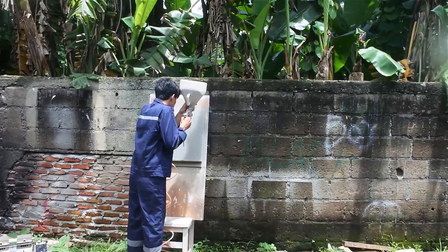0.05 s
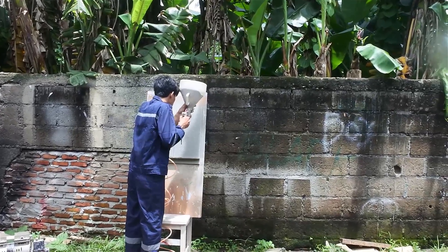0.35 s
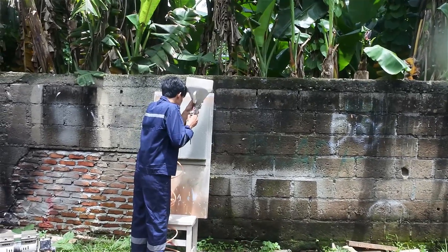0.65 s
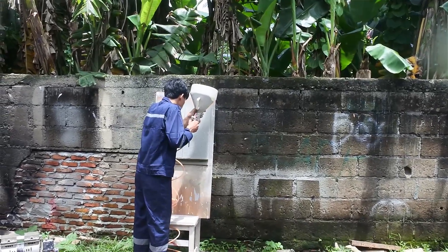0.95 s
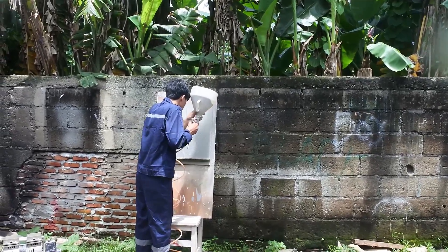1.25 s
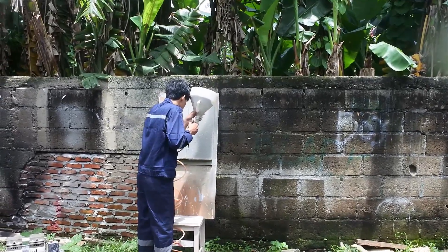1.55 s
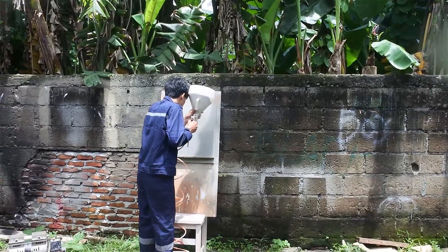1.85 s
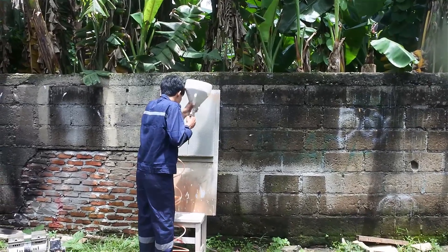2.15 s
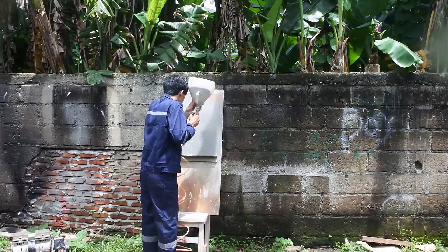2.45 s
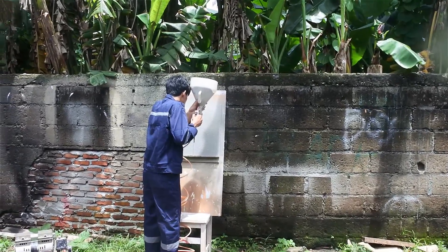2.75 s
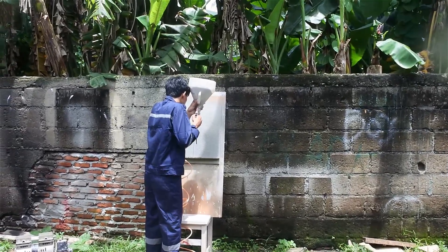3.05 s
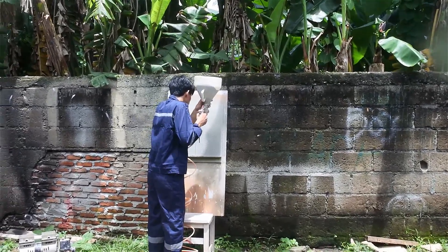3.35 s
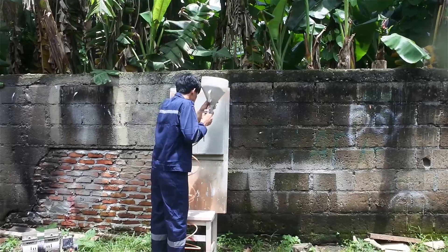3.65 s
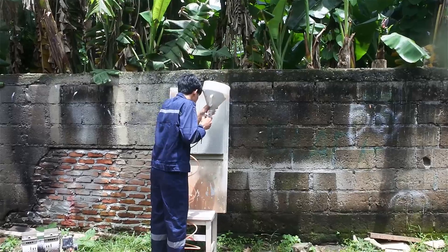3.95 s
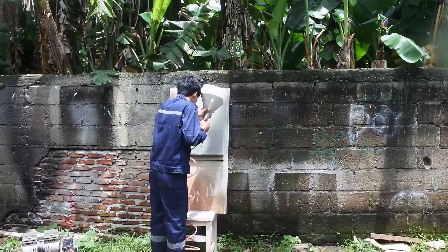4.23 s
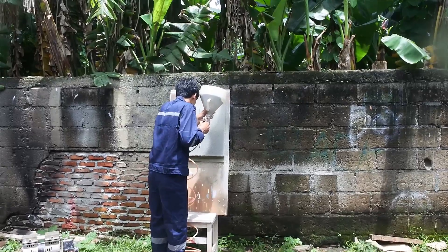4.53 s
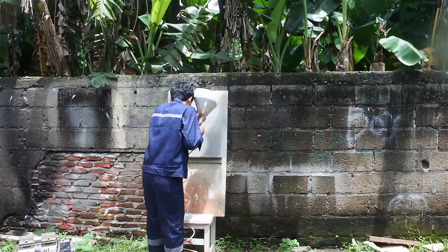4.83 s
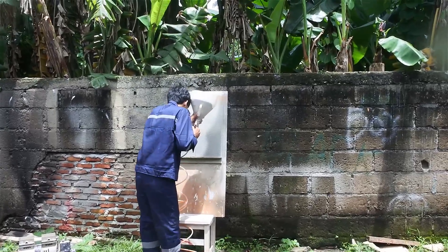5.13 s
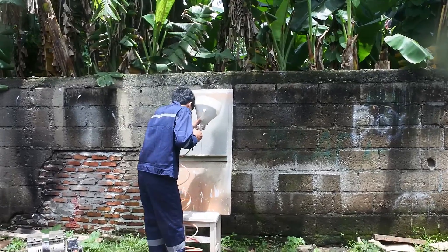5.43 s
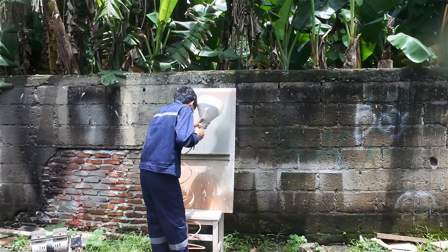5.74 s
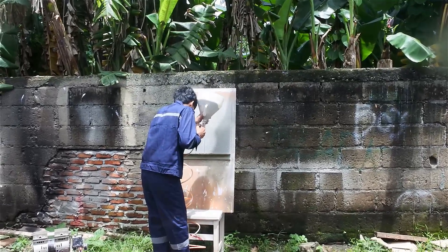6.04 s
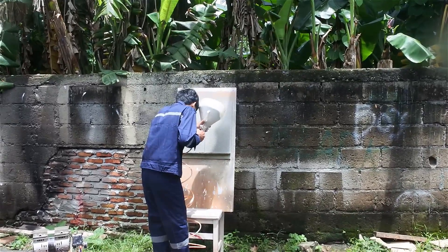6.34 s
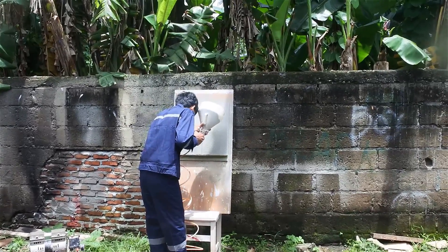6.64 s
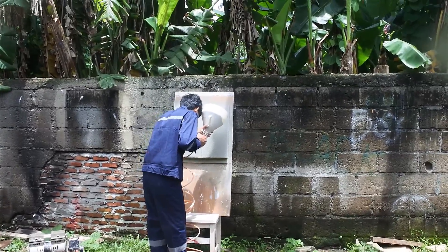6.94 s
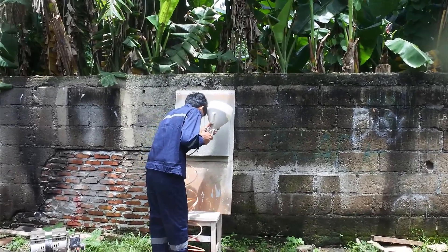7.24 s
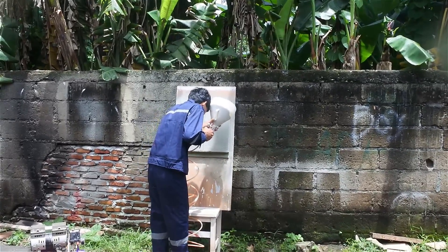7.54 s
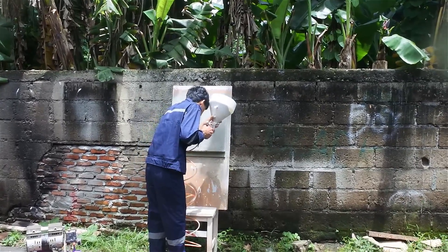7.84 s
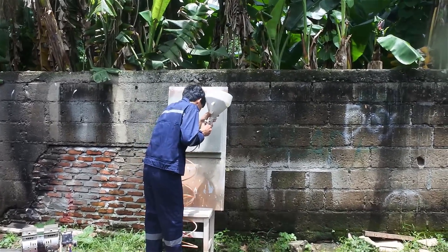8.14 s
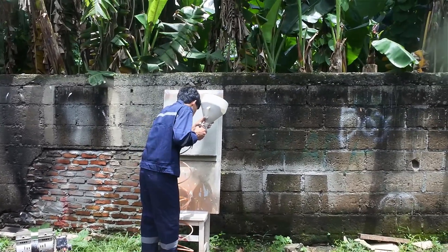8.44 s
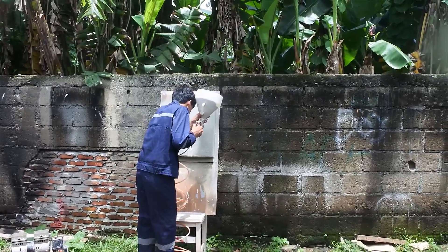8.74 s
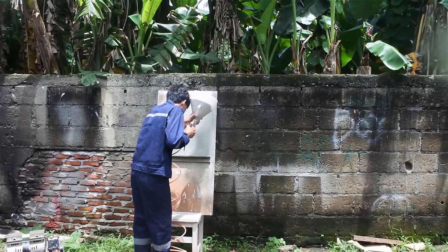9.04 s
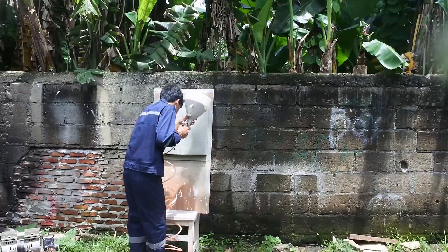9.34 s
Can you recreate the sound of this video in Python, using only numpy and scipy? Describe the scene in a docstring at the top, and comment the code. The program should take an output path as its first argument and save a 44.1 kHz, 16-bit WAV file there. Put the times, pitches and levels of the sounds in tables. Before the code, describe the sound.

Compressed air hisses from a paint sprayer, easing once briefly midway, over the low hum of a running compressor.

```python
"""A hopper gun sprays texture paint onto a board in a walled yard, a few metres from the microphone.
From the start its turbulent air jet hisses, half hidden behind the painter, and thick paint splutters
through in slugs, while a piston compressor drones close by. Midway the trigger is eased once and pulled
again. The spray carries on to the end, and a low rumble, probably traffic, keeps swelling beyond the wall."""
import sys
import numpy as np
from scipy import signal
from scipy.fft import rfft, irfft, next_fast_len
from scipy.io import wavfile
from scipy.ndimage import map_coordinates

SR = 44100
rng = np.random.default_rng(int(sys.argv[2]) if len(sys.argv) > 2 else 0)


def materialize(psi):
    """Save the field psi as 16-bit PCM at rate SR to the path in sys.argv[1].

    A 1-D psi becomes a single channel; in a 2-D psi each row is a channel.
    """
    bounded = np.clip(np.atleast_2d(psi).T, -1, 1)
    quanta = np.round(bounded * 32767).astype(np.int16)
    wavfile.write(sys.argv[1], SR, quanta)


N = 422462
TIME = np.arange(N) / SR
STEPS, SLOW_STEPS = TIME[::64], TIME[::256]  # coarse clocks for slow controls
EARS = np.array([[1], [-1]])  # left, right


def air_jet(flutter_db=0.94, grain_db=1.18, body_hz=5300, body_width_hz=1800, lag_ms=0.049, air_db=3):
    """Turbulence radiates hiss; the painter's acoustic shadow dims and delays its treble on the right."""
    # How the gun is held. Each row: time in seconds, then weights of brightness, leftward bias and body.
    aim = [(0, -4, -1.5, -2.5), (.55, 0, 6.5, 2.5), (1.4, 1.5, 8, 1), (3.2, 1.5, 7, 2), (5.3, 1.3, 9, -3.5),
           (6.0, 1, 9, 4), (6.8, 0.5, 9, -7), (8.2, -0.5, 7.5, 2), (8.8, -2, 2.5, -9),
           (9.55, 1.5, 2.5, 10.5)]
    # Spectrum of the jet. Each row: frequency in Hz, relative level in dB.
    jet_spectrum = [(800, -47.5), (2000, -16.5), (3400, -16.5), (4000, -14), (4500, -10.5), (5600, -9),
                    (6700, -2.5), (7800, -3), (9200, -2.5), (11000, -2.5), (12200, -7), (13600, -8),
                    (14600, -15), (15800, -28)]

    def path(hz, s):
        bright, bias, body = curves(aim, s)
        tilt_db = bright * slope([(4000, -2.0), (8500, -0.029), (13000, 1.24)], hz)
        body_db = 0.87 * body * bell(hz, body_hz, body_width_hz)
        db = slope(jet_spectrum, hz) + tilt_db + body_db + rings(hz, s) + swirl(hz, s)
        shade = slope([(3000, -0.11), (5200, -0.079), (7500, 1.24), (10000, 1.36), (13000, 1.66)], hz)
        sides = undb(EARS[:, :, None] * shade * bias / 2)
        delay = np.exp(1j * np.pi * EARS[:, :, None] * hz * np.clip(shade, 0, 1) * lag_ms / 1000)
        return undb(db) * sides / np.sqrt(np.mean(sides ** 2, axis=0)) * delay
    hiss = unit(sweep(stereo_noise([(2000, 1.0), (5000, 0.81), (7000, 0.098)]), path))
    return hiss * undb(air_flow() + air_db + flutter_db * walk(45) + grain_db * walk(900))


def air_flow(ease_s=4.605, pull_s=4.905, close_s=0.11, open_s=0.07, leak_db=-16.5):
    """Throttling: the air's level in dB falls to a leak as the trigger is eased and recovers on the pull."""
    # The jet at full trigger. Each row: time in seconds, relative level in dB.
    full_air = [(0, -19.5), (.7, -19.5), (1.1, -20), (1.7, -19), (2.2, -20), (2.6, -19), (3.95, -20.5),
                (4.55, -21), (5.1, -18), (5.63, -18.5), (5.69, -20.5), (6.55, -22.5), (6.8, -20.5),
                (7.6, -22), (8.25, -24.5), (8.58, -23.5), (8.78, -24), (9.2, -22), (9.58, -22.5)]
    eased = np.clip((TIME - ease_s) / close_s, 0, 1) * np.exp(-np.maximum(TIME - pull_s, 0) / open_s)
    return curves(full_air)[0] + leak_db * eased


def swirl(hz, s):
    """Treble resonances of the jet wander as it plays over the board; their boost is in dB."""
    # Each entry: resting frequency of a resonance in Hz.
    resting_hz = [7200, 9000, 11000, 13200]
    return sum((2.5 + 1.7 * walk(6, s)) * bell(hz, centre_hz * (1 + .045 * walk(3, s)), width_hz=550)
               for centre_hz in resting_hz)


def paint(splutter_db=1.03, drop_db=1.73, low_width_hz=290, middle_width_hz=620, middle_db=5, paint_db=3.5):
    """Atomisation: slugs burst into drops, whose crackle resonates in the gap between gun and board."""
    # Gap resonances. Each row: time in seconds, low and middle frequency in Hz, boost of the low one in dB.
    gap = [(0, 1700, 2660, 21.5), (.9, 1660, 2750, 11), (1.4, 1700, 2730, -2), (2.1, 1760, 2720, 5.5),
           (4.4, 1760, 2700, 1), (5.3, 1800, 2730, 5), (6.6, 1610, 2620, 9), (8, 1580, 2630, 9.5),
           (8.8, 1640, 2830, 12.5), (9.58, 1640, 2790, 6)]
    # Spectrum of the crackle. Each row: frequency in Hz, relative level in dB.
    paint_spectrum = [(400, -37), (800, -5), (1100, -8), (1400, -8.5), (2100, -7), (3000, 0), (3350, -4),
                      (3950, -2), (4600, -1), (6500, 2), (10000, -22), (15000, -14)]

    def path(hz, s):
        low_hz, middle_hz, low_db = curves(gap, s)
        gap_db = low_db * bell(hz, low_hz, low_width_hz) + middle_db * bell(hz, middle_hz, middle_width_hz)
        pan_db = slope([(1300, 0.0), (2600, -5.5), (3400, -4.5), (4500, 2.5)], hz)
        return undb(slope(paint_spectrum, hz) + gap_db + rings(hz, s) + EARS[:, :, None] * pan_db / 2)
    noise = stereo_noise([(1200, 0.93), (2800, 0.68), (3500, 0.12), (7000, 0.23)])
    crackle = noise * undb(drop_db * walk(1400) + splutter_db * walk(60))
    return unit(sweep(crackle, path)) * undb(paint_flow() + paint_db)


def paint_flow(feed_db=-31.5, db_per_air_db=0.43, lumpy_db=0.5):
    """Entrainment: the air draws a thin, lumpy feed of paint with slugs on top; its level is in dB."""
    air = air_flow()
    lumps = np.interp(TIME, STEPS, slug_flow(STEPS) + lumpy_db * walk(22, STEPS))
    return feed_db + db_per_air_db * (air - air.mean()) + lumps


def slug_flow(at, edge_s=0.033):
    """Slug flow: each lump passing the nozzle lifts the paint's level in dB, holds it and lets it fall."""
    # Each row: start in seconds, end in seconds, level over the steady feed in dB.
    slugs = [(0, 0.148, 7), (0.298, 0.62, 5), (0.864, 1.193, 5.5), (1.204, 1.3, 2.5), (1.49, 1.78, 3),
             (1.843, 2.01, 1.5), (2.04, 2.275, 6.5), (2.655, 2.894, 5), (3.185, 3.266, 5.5),
             (3.33, 3.377, 3), (3.832, 4.05, 5), (4.185, 4.22, 1), (4.246, 4.315, 5.5), (4.37, 4.47, 6),
             (4.907, 4.948, 7), (5.047, 5.124, 9.5), (5.176, 5.57, 5), (5.73, 6.06, 3.5), (6.174, 6.794, 3),
             (6.922, 7.09, 2.5), (7.186, 7.493, 2.5), (7.6, 7.753, 2.5), (7.84, 8.227, 2.5),
             (8.39, 8.802, 4.5), (8.856, 8.894, 5.5), (8.935, 9.256, 5.5), (9.31, 9.594, 6.5)]
    return sum(db * np.clip(np.minimum(at - start, end - at) / edge_s + .5, 0, 1) for start, end, db in slugs)


def rings(hz, s, width_hz=240, fade_s=0.02, full_slug_db=5.0):
    """Narrow resonances, driven by the slugs, come and go as the nozzle turns; their boost is in dB."""
    # Each row: start and end in seconds, first and last frequency in Hz, full boost in dB.
    resonances = [(0, .15, 4650, 4750, 6), (0, .5, 8050, 10800, 3), (.3, .6, 4700, 4750, 3),
                  (2.05, 2.9, 2800, 2750, 1.5), (6.3, 7.897, 2780, 2700, 9.5), (6.3, 8.2, 2320, 2340, 6),
                  (6.3, 7.8, 9200, 9150, 10.5), (6.3, 7.8, 6600, 6350, 11), (8.05, 8.21, 5600, 5570, 13),
                  (8.4, 9.58, 4640, 4590, 7), (8.4, 9.58, 5700, 5480, 7), (8.93, 9.28, 9300, 9600, 10),
                  (9.33, 9.58, 5950, 6000, 5.5)]
    drive = np.clip(slug_flow(s) / full_slug_db, 0, 1)
    boost_db = 0
    for start, end, first_hz, last_hz, db in resonances:
        fade = np.clip(np.minimum(s - start, end - s) / fade_s + 1, 0, 1)
        centre_hz = np.interp(s, [start, end], [first_hz, last_hz])
        boost_db = boost_db + db * fade * bell(hz, centre_hz, width_hz)
    return drive * boost_db


def choking(half_width_s=0.015):
    """Obstruction: thick paint plugs the nozzle for a moment, and the gain of the whole spray dips."""
    # Each row: time in seconds, depth in dB (a negative depth is a brief lift).
    chokes = [(1.32, -1.5), (2.03, 2), (2.29, 1.5), (3.01, 3), (4.06, 1), (5.14, 1), (6.13, 4.5),
              (6.57, 2.5), (7.51, 4), (8.28, 3.5), (8.83, 2), (8.91, 2), (9.29, 2)]
    dip_db = sum(db * np.exp(-((STEPS - s) / half_width_s) ** 2) for s, db in chokes)
    return np.interp(TIME, STEPS, undb(-dip_db))


def reflections(spray):
    """Comb filtering: echoes off board, hopper and wall interfere with the spray, sliding as the hand moves."""
    # Each row: mean delay in milliseconds, level against the direct sound in dB.
    reflectors = [(.9, -13), (1.6, -12), (2.7, -12), (4.3, -13), (7.3, -14)]
    out, samples = spray, np.arange(N)
    for ms, db in reflectors:
        sway = np.interp(TIME, SLOW_STEPS, walk(3.5, SLOW_STEPS))
        delays = ms * (1 + .03 * sway + .004 * EARS) * SR / 1000
        echo = np.array([np.interp(samples - d, samples, channel) for d, channel in zip(delays, spray)])
        out = out + undb(db) * echo
    return out / np.sqrt(1 + sum(undb(db) ** 2 for _, db in reflectors))


def compressor(crank_hz=23.352, wander=.0005, waver_db=1.3, uneven_db=1.0, knock_share=0.93,
               valve_db=-17, fan_db=-8):
    """Periodic excitation: each crank turn repeats knocks, tank drone and clatter, over the cooling air."""
    # Swell of the machine. Each row: time in seconds, level in dB.
    drone = [(0, -22), (.4, -22.5), (1.3, -26.5), (3.4, -26.5), (4.6, -27), (5.4, -24.5), (5.9, -29),
             (7.2, -30), (8.2, -30), (8.6, -27), (9.58, -25.5)]
    # Harmonics of one turn. Each row: multiple of the crank frequency, relative level in dB.
    stroke = [(2, -20.5), (3, -17), (4, -15), (5, -11), (6, -6), (7, 0.5), (8, 0.5), (9, -3.5), (10, -28),
              (11, -13.5), (12, -16), (13, -6.5), (14, -24.5), (15, -2.5), (16, -9.5), (17, -5),
              (18, -15.5), (19, -9), (20, -18), (21, -11.5), (22, -27.5), (23, -7), (24, -14), (26, -12.5),
              (28, -17.5)]
    turns = np.cumsum(crank_hz * (1 + wander * walk(1.985))) / SR
    multiples, db = np.transpose(stroke)
    # the upper harmonics knock roughly together; the tank holds the low ones back and spreads them out
    late_turns = np.interp(multiples, [6, 9, 10, 19, 21], [.98, .1, 0, 0, .1])
    scatter = np.interp(multiples, [2, 6, 9, 13, 19, 30], [1.5, .1, .1, .3, .35, 1.5])
    phases = 2 * np.pi * np.cumsum(late_turns) + scatter * rng.standard_normal(len(db))
    shares = undb(db) / np.sqrt(np.sum(undb(db) ** 2) / 2)
    level_db = curves(drone)[0]
    # the knocks swell less than the drone, and no two are equally hard
    knock_db = level_db.mean() + knock_share * (level_db - level_db.mean()) + uneven_db * walk(45)
    tank_gain, knock_gain = undb(level_db), undb(knock_db)
    hum = 0
    for k, share, phase in zip(multiples, shares, phases):
        waver = np.interp(TIME, SLOW_STEPS, undb(waver_db * walk(9, SLOW_STEPS)))
        gain = tank_gain if k <= 10 else knock_gain
        hum = hum + share * waver * gain * np.cos(2 * np.pi * k * turns - phase)
    return hum + (undb(valve_db) * valves(turns) + undb(fan_db) * fan()) * tank_gain


def valves(turns):
    """The valves clatter alike on every turn, and this repetition gives a line spectrum."""
    # Each row: frequency in Hz, relative level in dB.
    valve_spectrum = [(550, -54), (760, 2), (950, 3.5), (1120, 2), (1300, -18), (1600, 2), (3000, -88),
                      (8000, -45)]
    one_turn = irfft(np.exp(2j * np.pi * rng.random(size=1025)))
    clatter = np.interp(turns, np.arange(len(one_turn)) / len(one_turn), one_turn, period=1)
    return unit(colour(clatter, valve_spectrum))


def fan():
    """Turbulent cooling air makes a low rush, most coherent between the channels at long wavelengths."""
    # Each row: frequency in Hz, relative level in dB.
    fan_spectrum = [(25, -42), (40, -27), (52, 0.5), (80, -4), (108, -3), (130, -5), (185, 1.5), (260, -5),
                    (380, -4), (550, -6.5), (730, -14), (1100, -6), (1500, -17.5), (3000, -19),
                    (12000, -48)]
    draught = stereo_noise([(120, .998), (250, .99), (600, .93), (1400, .85), (4000, .3)])
    return unit(colour(draught, fan_spectrum))


def rumble():
    """Diffraction carries low sound over the wall: dull swells, each in a band around its own pitch."""
    # What gets over the wall. Each row: frequency in Hz, relative level in dB.
    wall_spectrum = [(25, -40), (60, -10), (400, 10), (700, -9), (2000, -30)]
    # Each row: peak time in seconds, half length in seconds, level in dB, band centre in Hz.
    swells = [(.1, 0.37, -32, 130), (3.7, 0.22, -33, 180), (4.2, .4, -35.5, 79.4), (4.994, 0.21, -30, 89),
              (5.3, .4, -39, 170), (5.85, 0.17, -40, 100), (7.452, 0.16, -35, 100), (7.6, 1.3, -35.5, 150),
              (8.85, 0.29, -33, 115)]
    size = next_fast_len(N)
    hz = np.fft.rfftfreq(size, 1 / SR)
    spectrum = rfft(rng.standard_normal(size)) * undb(slope(wall_spectrum, hz))
    out = 0
    for peak_s, half_s, db, centre_hz in swells:
        band = irfft(spectrum * bell(hz, centre_hz, width_hz=centre_hz), size)
        roar = np.roll(band, rng.integers(size))[:N]
        envelope = np.interp(TIME, STEPS, np.exp(-((STEPS - peak_s) / half_s) ** 2 / 2))
        out = out + unit(roar) * undb(db) * envelope
    return out


def undb(db):
    """Decibels to amplitude gain."""
    return 10 ** (np.asarray(db) / 20)


def unit(x):
    """Normalisation to an rms of 1."""
    return x / np.sqrt(np.mean(x ** 2))


def curves(table, at=TIME):
    """Linear interpolation in time of a table's columns."""
    s, *columns = np.transpose(table)
    return [np.interp(at, s, c) for c in columns]


def slope(points, hz):
    """Interpolation of (Hz, value) points along a logarithmic frequency axis."""
    f, values = np.transpose(points)
    return np.interp(np.log(np.maximum(hz, 1)), np.log(f), values)


def colour(x, points):
    """Linear filtering by a spectrum of (Hz, dB) points."""
    size = next_fast_len(N)
    return irfft(rfft(x, size) * undb(slope(points, np.fft.rfftfreq(size, 1 / SR))), size)[..., :N]


def walk(rate, at=TIME):
    """Smooth random modulation, of spread near 1, that changes rate times a second."""
    knots = rng.standard_normal(2 ** 14)
    return map_coordinates(knots, [at * rate], order=2, mode="wrap")


def stereo_noise(coherence):
    """Partly coherent white noise in two channels, set by (Hz, correlation) points."""
    size = next_fast_len(N)
    mid, side = rfft(rng.standard_normal((2, size)))
    alike = np.clip(slope(coherence, np.fft.rfftfreq(size, 1 / SR)), 0, 1)
    return irfft(mid * np.sqrt(1 + alike) + EARS * side * np.sqrt(1 - alike), size)[:, :N]


def sweep(x, gain, size=1024):
    """Time-varying filtering: gain(Hz column, seconds row) is applied frame by frame."""
    hz, s, frames = signal.stft(x, SR, nperseg=size)
    return signal.istft(frames * gain(hz[:, None], s), SR, nperseg=size)[1][..., :N]


def bell(hz, centre_hz, width_hz):
    """Resonance curve, 1 at its centre."""
    return 1 / (1 + (2 * (hz - centre_hz) / width_hz) ** 2)


def scene():
    """Superposition of the spray with its echoes, the compressor and the distant rumble."""
    spray = (air_jet() + paint()) * choking()
    return reflections(spray) + compressor() + rumble()


def record(dry, top_hz=15800):
    """Band limiting: a steep low-pass filter cuts the highest treble."""
    return signal.sosfilt(signal.ellip(10, .2, 70, top_hz, fs=SR, output="sos"), dry)


dry = scene()
out = record(dry)
materialize(out)
```